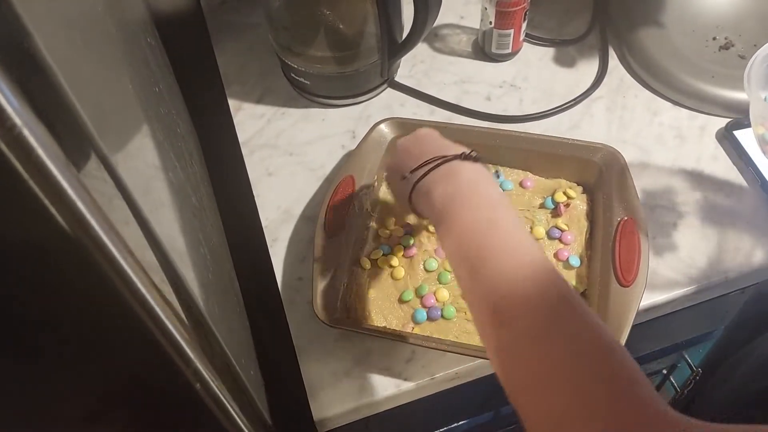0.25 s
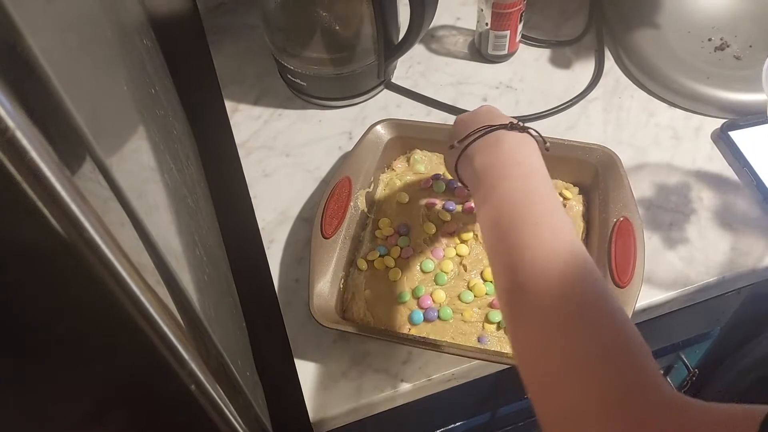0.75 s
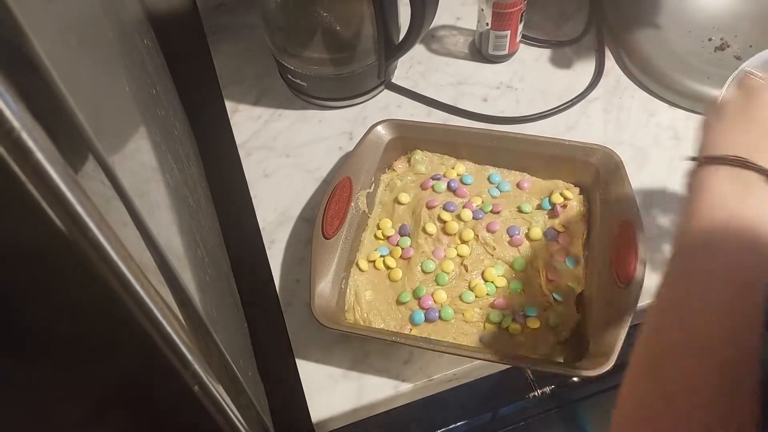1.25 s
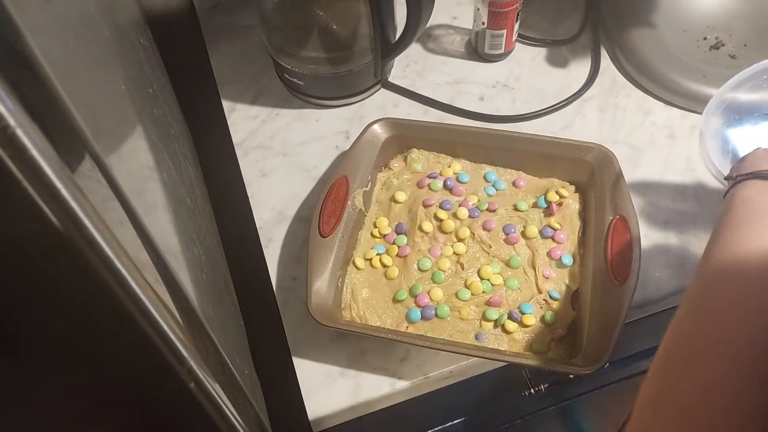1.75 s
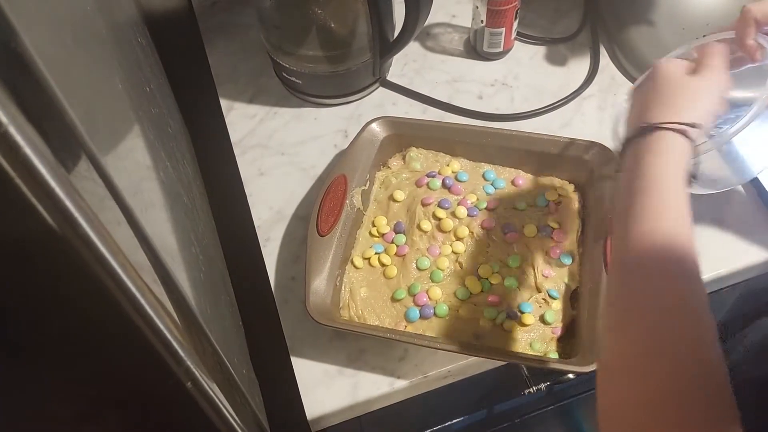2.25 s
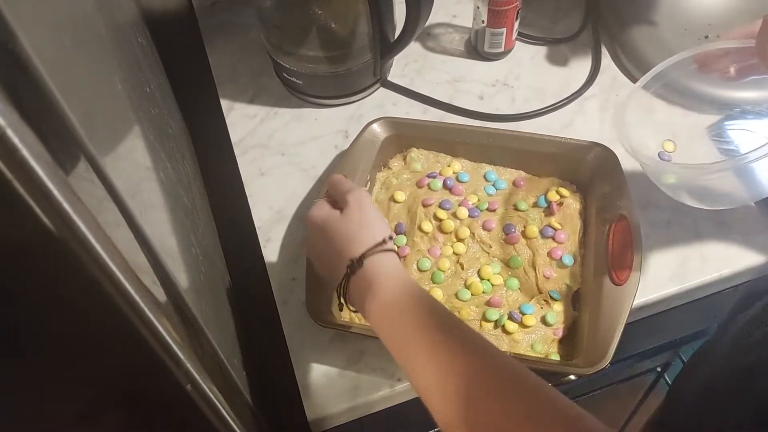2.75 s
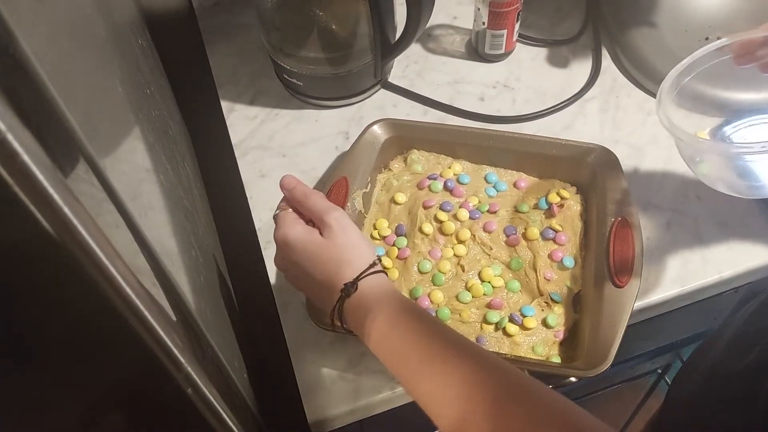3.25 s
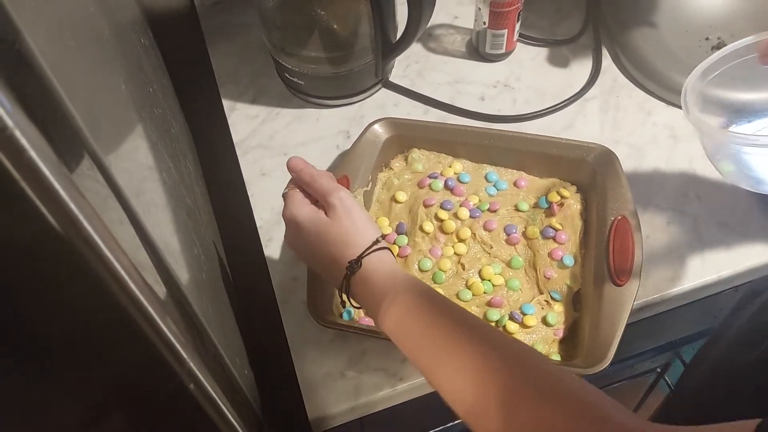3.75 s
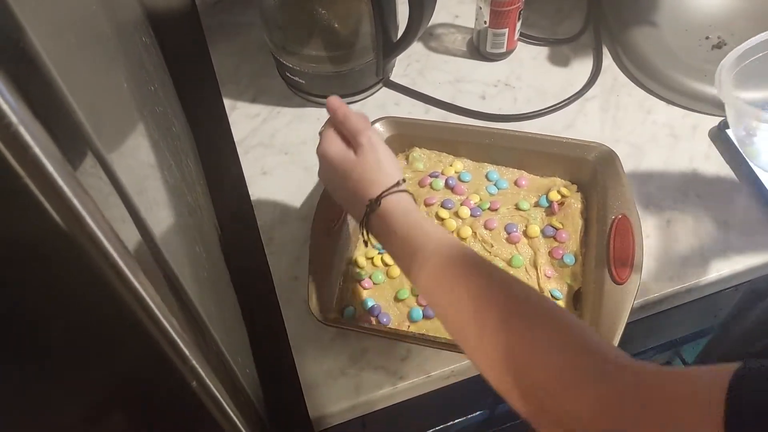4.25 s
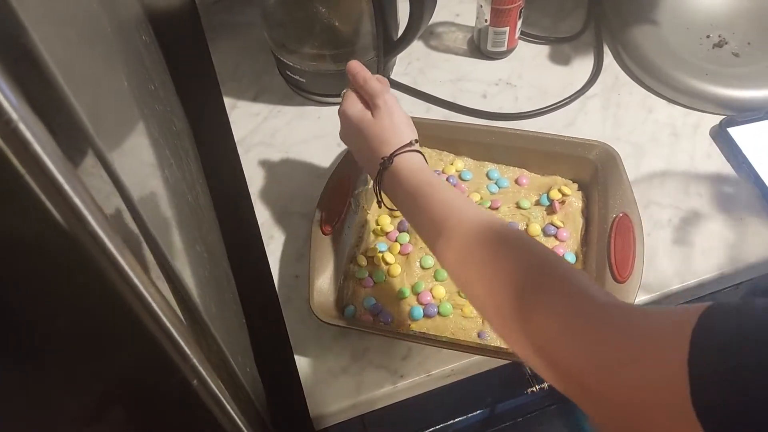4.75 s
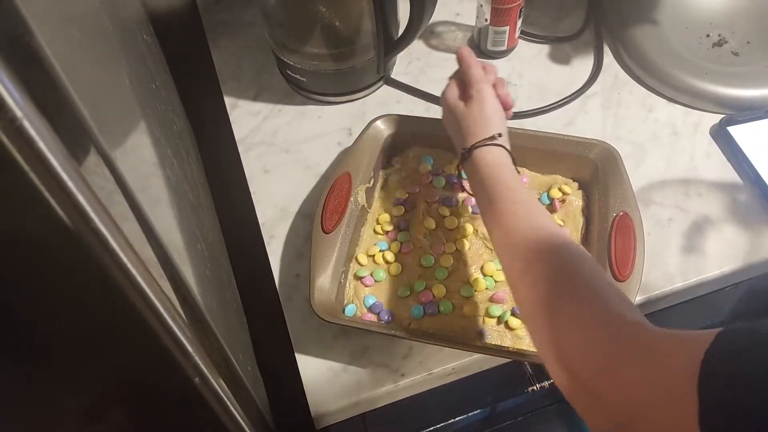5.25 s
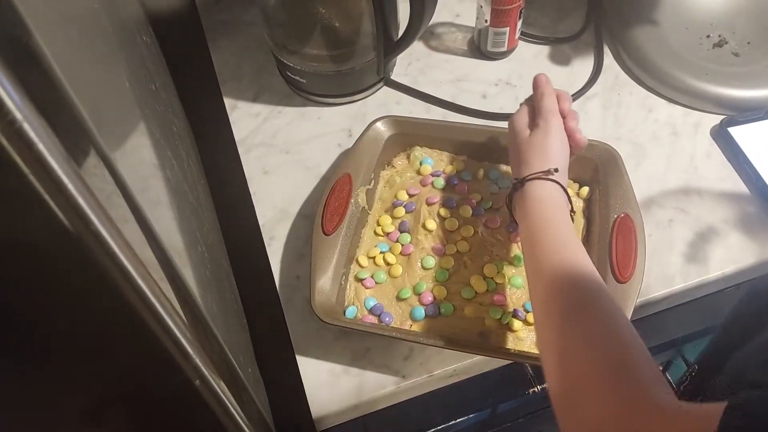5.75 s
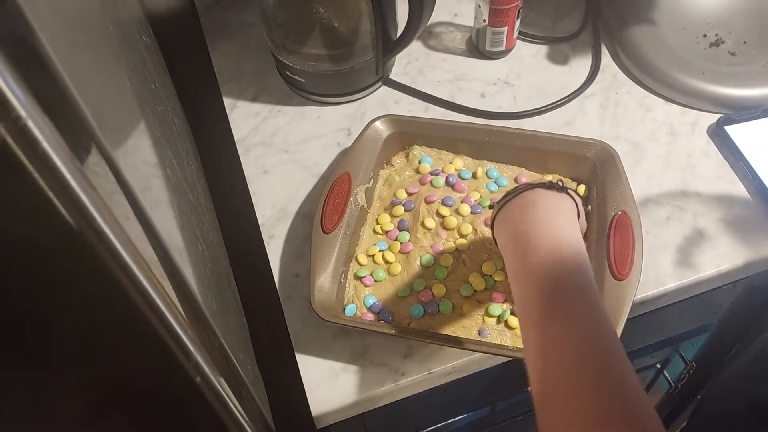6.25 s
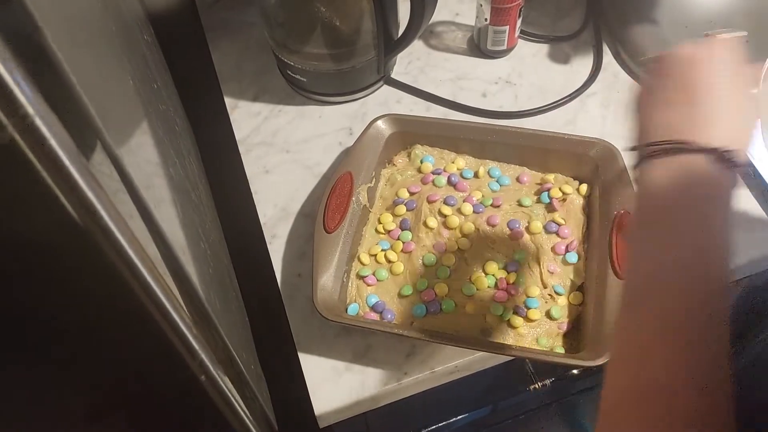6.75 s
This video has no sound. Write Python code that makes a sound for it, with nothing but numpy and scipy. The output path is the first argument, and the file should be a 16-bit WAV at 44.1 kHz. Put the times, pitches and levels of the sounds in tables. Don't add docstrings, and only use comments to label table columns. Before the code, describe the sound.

Bright, dry candy clicks with tiny bounces land on soft batter, in sparse bursts. About a second and a half in, fingers rake a plastic bowl, its thin wall knocking dully while shells clatter. Then a second handful drops in irregular ticks with pauses, a couple of ringing metal-pan strikes and a final patter. Short bright room reflections, faint hiss and a wavering fridge hum; body-worn microphone, near the hands.

```python
import sys
import numpy as np
from scipy import signal
from scipy.fft import rfft, irfft
from scipy.io import wavfile
from scipy.ndimage import uniform_filter1d

SR = 44100
rng = np.random.default_rng(int(sys.argv[2]) if len(sys.argv) > 2 else 0)


def attenuation_scalar(level_db):
    decades = np.asarray(level_db, float) / 20
    return 10 ** decades


def waveform_to_disk(signal):
    frames = np.transpose(np.atleast_2d(signal))
    scaled = np.clip(frames, -1, 1) * 32767
    samples = np.round(scaled).astype(np.int16)
    wavfile.write(sys.argv[1], SR, samples)


N = 308259
BOWL_LAG = 18


def rings(modes, gains, size, wander=0.026):
    hz, db, t60 = (column[:, None] for column in np.transpose(modes))
    t = np.arange(size) / SR
    shift = 1 + wander * rng.standard_normal((len(gains), len(modes), 1))
    tone = np.sin(2 * np.pi * hz * shift * t) * attenuation_scalar(db - 60 * t / t60)
    return np.einsum("ek,ekt->et", gains, tone)


def place(times, grains):
    start = np.round(times * SR).astype(int)[:, None]
    at = (start + np.arange(grains.shape[1])).ravel()
    return np.bincount(at, grains.ravel(), N + grains.shape[1])[:N]


def band(x, lo_hz, hi_hz, order=2):
    limits = [lo_hz, min(hi_hz, 0.45 * SR)]
    return signal.sosfilt(signal.butter(order, limits, "band", fs=SR, output="sos"), x)


def peak_one(grains):
    return grains / np.abs(grains).max(axis=-1, keepdims=True)


def colour(x, hz, db, size=1024):
    f = np.maximum(np.arange(size // 2 + 1) * SR / size, 1)
    log_gain = np.interp(np.log(f), np.log(hz), db) * np.log(10) / 20
    ceps = irfft(log_gain)
    ceps[1:size // 2] *= 2
    ceps[size // 2 + 1:] = 0
    response = irfft(np.exp(rfft(ceps)))
    return signal.fftconvolve(x, response)[:len(x)]


def curve(table):
    s, *columns = np.transpose(table)
    return [np.interp(np.arange(N) / SR, s, column) for column in columns]


def kitchen():
    # (pitch [Hz], left level per Hz [dB], right level per Hz [dB])
    air_levels = [(30.12, -15.5, -14.5), (114.8, -2.5, -10.5), (323.4, -8.5, -13), (736, -46, -32.5),
                  (2000, -43, -31.5), (5800, -32, -39), (7360, -18, -34), (9000, -32, -57.5),
                  (10700, -21.5, -35.5), (12300, -32.5, -38.5), (14900, -24, -25), (15540, -25.5, -37.5),
                  (16100, -60.5, -56)]
    # (time [s], level [dB])
    hum_levels = [(0.25, -83), (0.7, -67.5), (1.25, -76), (2.3, -68), (2.7, -64), (3.05, -76.5), (3.3, -75),
                  (3.5, -93), (3.87, -71.5), (4.03, -88.5), (4.3, -70), (4.82, -68), (5.3, -80.5),
                  (5.76, -65), (5.92, -73), (6.17, -75.5), (6.55, -61.5), (6.8, -71.5)]
    # (pitch [Hz], width [Hz], level [dB])
    motor_lines = [(95, 8.1, -81), (138.03, 2.8, -76), (226, 12, -85.5), (278.2, 3.6, -77),
                   (322, 15, -96.5)]
    hz, left_db, right_db = np.transpose(air_levels)
    shared, own = rng.standard_normal(N), rng.standard_normal((2, N))
    low_pass = signal.butter(1, 350, fs=SR, output="sos")
    lows = 0.54 * signal.sosfilt(low_pass, shared - own)
    left = colour(own[0] + lows[0], hz, left_db, size=4096)
    right = colour(own[1] + lows[1], hz, right_db, size=4096)
    air = np.array([left, right]) * attenuation_scalar(-46)

    wobble_hz = 1.5 * uniform_filter1d(rng.standard_normal(N), SR // 8) * np.sqrt(SR / 8)
    hum = attenuation_scalar(curve(hum_levels)[0] + 5.5) * np.sin(2 * np.pi * np.cumsum(59.5 + wobble_hz) / SR)
    for f, width, db in motor_lines:
        line = band(shared + 0.5 * own, f - width / 2, f + width / 2, order=1)
        hum = hum + line * attenuation_scalar(db) / line.std()
    return air + hum * attenuation_scalar([[3.5], [-7]])


def cracks(count, near_db, far_db, size=1300):
    t = np.arange(size) / SR
    noise, sparse = rng.standard_normal((count, 2, size)).transpose(1, 0, 2)
    fading = attenuation_scalar(near_db - 60 * t / 0.049) + attenuation_scalar(far_db - 60 * t / 0.05)
    scatter = noise * attenuation_scalar(1.3 * sparse) * fading
    scatter[:, 2] += 1
    delay, strength = rng.random((count, 2)).T
    echo_at = (SR * (0.0006 + 0.0007 * delay)).astype(int)
    scatter[np.arange(count), echo_at] += 2.03 * strength
    return scatter * np.minimum((size - np.arange(size)) / 200, 1)


def contacts(s, shell_db, tap_db, tap_hz, thud_db=-14.5, sharpness=0.72, lag=0, hollow_db=-30):
    # (pitch [Hz], level [dB], time to fade by 60 dB [s])
    body_modes = [(1190, -9.5, 0.036), (1654, -1, 0.017), (2074, -4.5, 0.015), (2500, 6.5, 0.0077),
                  (3000, 1, 0.027), (3310, -7.5, 0.02), (4160, -6.5, 0.035)]
    turn = 2 * np.pi * tap_hz[:, None] * np.arange(300) / SR
    broad = np.sin(turn) * np.exp(-turn / 2 / sharpness)
    broad[:, 1] += 0.4
    broad += attenuation_scalar(hollow_db) * np.sin(turn) * np.exp(-turn / 2 / 4.5)
    struck = attenuation_scalar(-27.5 + 4.2 * np.minimum(tap_db - shell_db, 0))[:, None]
    gains = rng.choice([-1.0, -1.2, 0.94, 0.8], (len(s), len(body_modes)))
    body = rings(body_modes, gains, size=1300) * struck
    body[:, :300] += broad

    ports = []
    for port_db in (0.5, -0.5):
        shell = peak_one(band(cracks(len(s), near_db=-24, far_db=-32), 7600, 22000))
        tap = signal.fftconvolve(body, cracks(len(s), near_db=-22, far_db=-22.5), axes=1)[:, :1300]
        tap = peak_one(band(band(tap, 1300, 10000), 950, 14000))
        clicks = place(s, shell * attenuation_scalar(shell_db - 14.5 + port_db)[:, None])
        taps = place(s, tap * attenuation_scalar(tap_db - 7.5)[:, None])
        ports.append(clicks + taps)

    bare = band(place(s, attenuation_scalar(shell_db - 6.5)[:, None]), 5100, 27000)
    bare = bare + band(place(s, body * attenuation_scalar(tap_db + 5)[:, None]), 1100, 7600, order=3)
    thud = band(place(s, attenuation_scalar(0.5 * (shell_db + tap_db) + thud_db)[:, None]), 230, 900)
    return np.array([np.roll(ports[0], lag), ports[1], bare + thud])


def landings(s, shell_db, tap_db, thud_db):
    # (time [s], tap centre [Hz])
    tray_spot = [(0, 4180), (1.2, 4470), (3.08, 4140), (3.095, 3200), (3.13, 3000), (3.23, 1700),
                 (3.26, 1760), (3.3, 4200), (4.0, 4500), (4.68, 2000), (4.87, 2000), (5.0, 5900),
                 (5.75, 5200), (5.78, 2880), (5.83, 2800), (5.98, 4350), (6.39, 4240), (6.41, 1790),
                 (6.5, 4000), (6.7, 4500)]
    tap_hz = np.interp(s, *np.transpose(tray_spot))
    hollow_db = np.where(tap_hz < 2000, -12.5, -30)[:, None]
    first = contacts(s, shell_db, tap_db, tap_hz, thud_db, hollow_db=hollow_db)

    wait, scatter = rng.random((len(s), 2)).T
    again_s = s + 0.003 + 0.0043 * wait
    loss_db = 0.5 * (2 * scatter - 1)
    return first + contacts(again_s, shell_db - 22 + loss_db, tap_db - 13 + loss_db, tap_hz)


def first_handful():
    # (time [s], shell click [dB], body tap [dB])
    drops = [(0.0, -17, -32), (0.0057, -12.5, -60), (0.1342, -34, -62), (0.195, -41, -73),
             (0.2469, -28, -70), (0.3128, -9.5, -34), (0.325, -8.5, -29), (0.3626, -33.5, -41),
             (0.6487, -11, -76), (0.933, -11, -31), (0.952, -29, -45), (0.9641, -8.5, -25.5),
             (1.116, -30.5, -37.5), (1.1341, -39, -40)]
    return landings(*np.transpose(drops), thud_db=1.5)


def room(blows):
    # (pitch [Hz], time to fade by 60 dB [s], level [dB])
    echo_fade = [(483, 0.41, -14), (1260, .28, -11.5), (3500, 0.36, -18), (8900, 0.27, -6),
                 (13300, 0.43, -100)]
    t = np.arange(SR // 2) / SR
    hz, t60, db = np.transpose(echo_fade)
    echoes = 0
    for f in 350 * 2.0 ** np.arange(6):
        life_s, gain_db = (np.interp(np.log(f), np.log(hz), column) for column in (t60, db))
        noise = rng.standard_normal((2, len(t)))
        alike = np.clip(1 - (f / 860) ** 2, 0, 1)
        noise[1] = alike * noise[0] + np.sqrt(1 - alike ** 2) * noise[1]
        echoes = echoes + band(noise, f / 2.17, f * 1.655) * attenuation_scalar(gain_db - 21 - 60 * t / life_s)
    echoes = echoes * np.minimum(t / 0.0067, 1)
    return signal.fftconvolve(blows[None], echoes, axes=1)[:, :N]


def settling():
    # (time [s], shell click [dB], body tap [dB])
    skips = [(0.137, -43, -78.5), (0.3604, -29, -68), (0.3656, -25, -60), (0.3674, -29, -62),
             (0.3706, -33, -68), (0.3828, -33, -65), (0.6797, -36, -58), (0.6923, -44, -61),
             (0.7069, -46, -76), (1.1332, -42, -61), (1.3142, -54, -78), (1.3311, -56, -89),
             (1.3344, -47, -87), (1.3385, -49, -82), (1.4333, -33, -37), (2.8288, -57, -77.5),
             (2.8975, -54, -85), (3.0733, -22, -60), (3.1218, -24, -32), (3.1979, -36, -57),
             (3.2571, -31, -47), (3.6835, -29, -78), (3.6883, -30, -76.5), (3.71, -47, -83),
             (3.7205, -41, -81.5), (3.7292, -46, -83), (3.7358, -53, -83), (3.7388, -50, -78),
             (3.7443, -49, -80.5), (3.7485, -51, -82), (3.7602, -52, -84), (3.8129, -51, -84),
             (3.8501, -50, -79), (3.9773, -23, -62.5), (3.9922, -31, -63), (4.0066, -34.5, -69.5),
             (4.5302, -51.5, -85), (4.539, -50, -82), (4.7478, -10, -43.5), (4.7846, -33, -57),
             (5.0023, -46, -75), (5.4937, -55.5, -88), (5.6932, -11.5, -46.5), (5.7191, -7.5, -46),
             (5.7249, -10, -51), (5.7308, -23, -53), (6.0843, -26, -63), (6.1546, -47, -80.5),
             (6.1795, -33, -76), (6.1883, -42, -72), (6.2006, -33.5, -67), (6.4779, -33, -38),
             (6.5259, -34, -60), (6.6182, -18, -52), (6.647, -17, -49), (6.8827, -57, -73)]
    return contacts(*np.transpose(skips), tap_hz=np.full(len(skips), 4000.0), thud_db=-15.5)


def bowl(s, wall_db, deep_db, upper_db):
    # (pitch [Hz], level [dB], time to fade by 60 dB [s])
    bowl_modes = [
        (289.7, -1.5, 0.08),
        (761.6, 1.5, 0.064),
        (822, 2.5, 0.045),
        (982, 3.5, 0.024),
        (1043.4, -2.5, 0.09),
        (438, -11.5, 0.023),
        (570, -10.5, 0.031),
        (1890, -18, 0.086),
        (667.2, -7.5, .04),
    ]
    size = 3600
    left = size - np.arange(size)
    gains = (-1.0) ** np.arange(len(bowl_modes)) * attenuation_scalar(2 * rng.standard_normal((len(s), len(bowl_modes))))
    gains[:, 0] = attenuation_scalar(deep_db + 1)
    gains[:, 1:3] *= attenuation_scalar(-np.maximum(upper_db, 0))[:, None]
    gains[:, 3:5] *= attenuation_scalar(np.minimum(upper_db, 0))[:, None]
    grip = attenuation_scalar(-10.5 * np.clip((np.arange(size) / SR - 0.012) / 0.003, 0, 1))
    ring = rings(bowl_modes[1:], gains[:, 1:], size, wander=0.017) * grip
    ring = ring + rings(bowl_modes[:1], gains[:, :1], size, wander=0.01)
    ring = band(band(ring, 230, 2300), 130, 6000) * np.minimum(left / 600, 1)
    wall = place(s, ring * attenuation_scalar(wall_db - 10.5)[:, None])
    wall = wall + band(place(s, attenuation_scalar(wall_db + 4.5)[:, None]), 76, 350, order=3)
    return np.array([wall, 1.5 * np.roll(wall, -4), wall])


def knocks():
    # (time [s], wall [dB], deep mode relative to wall [dB], upper minus lower modes [dB])
    blows = [(1.115, -61.5, 9, 5), (1.14, -53.5, -18, 16), (1.4421, -36, -4, 5), (1.4544, -22, -9, 7.5),
             (1.468, -18, -32, 10), (1.5866, -21, -7, -14), (1.667, -19.5, -42, 3),
             (1.6748, -15.5, -3.5, 13), (1.7752, -25.5, -19.5, 12), (1.8342, -34.5, -31, -5),
             (1.904, -31, -21, 8), (1.9376, -28, -29, 8.5), (1.979, -27, -30.5, 11.5), (2.037, -34, 0, 8),
             (2.0877, -16, -7.5, 3.5), (2.1243, -20.5, -20.5, 3.5), (2.143, -22, -4, 6.5),
             (2.1692, -25.5, -4.5, 3), (2.3481, -3, -10.5, -12), (2.372, -26, -12, -14.5),
             (2.397, -17, -9, -17), (2.4672, -13.5, -7, 1), (2.5226, -36, 4, -4), (2.5977, -28.5, -45, 35),
             (2.6665, -38, -35, 4), (3.864, -60, -31.5, -7), (0.934, -52.5, -29, -7),
             (0.313, -56.5, -33.5, -7.5), (2.231, -27, -25, 4.5), (6.77, -59.5, -18.5, 7),
             (6.866, -54.5, -19, 5), (6.885, -52, -23.5, 17), (6.8, -62, -22, 4), (6.935, -64, -16, 11.5)]
    return bowl(*np.transpose(blows))


def further_contacts():
    # (time [s], shell click [dB], body tap [dB], tap centre [Hz])
    single_contacts = [(0.6556, -21.5, -44, 1510), (1.141, -46, -56, 4500), (2.677, -25, -61, 2500),
                       (3.8632, -37, -44.5, 1400), (4.7568, -25, -25.5, 5500), (4.852, -25, -25.5, 5600),
                       (4.6926, -26, -37.5, 2000), (5.048, -32, -33, 1915), (6.87, -64, -51.5, 2372),
                       (0.9517, -45, -32.5, 2500), (1.161, -53, -49, 3500), (1.211, -62, -55, 2500),
                       (3.246, -29, -27.5, 3500), (3.876, -59, -60, 1600), (3.892, -66, -49.5, 1510),
                       (3.909, -65, -58, 1495), (3.9519, -27, -38.5, 3000), (5.008, -33, -47, 4000),
                       (6.4137, -9, -12.5, 4200), (6.4177, -11, -20.5, 1490), (6.417, -23, -14, 6500),
                       (1.667, -43, -28, 2500), (3.104, -17.5, -16.5, 4280), (3.1238, -20, -23, 1500),
                       (5.726, -26.5, -34.5, 3500), (6.437, -34, -20, 6000), (6.465, -33.5, -27, 5800),
                       (6.563, -22, -25, 4500), (6.59, -25, -32.5, 5000), (6.624, -25, -33, 5950)]
    return contacts(*np.transpose(single_contacts))


def counter():
    # (time [s], level [dB])
    bumps = [
        (1.229, -59.5),
        (3.348, -60.5),
        (5.059, -55.5),
        (6.451, -57.5),
        (6.62, -57),
    ]
    # (pitch [Hz], level [dB], time to fade by 60 dB [s])
    counter_modes = [(145.7, 0, 0.13), (230, 0.5, 0.14), (331, -2.5, 0.16)]
    s, bump_db = np.transpose(bumps)
    gains = rng.uniform(0.84, 1, (len(s), len(counter_modes)))
    swell = np.minimum(np.arange(4000) / SR / 0.012, 1)
    ring = rings(counter_modes, gains, size=4000, wander=0.068) * swell
    bump = place(s, ring * attenuation_scalar(bump_db)[:, None])
    return np.array([bump, 0.6 * bump, bump])


def rattling():
    # (time [s], shell click [dB], body tap [dB])
    rattle = [(1.4403, -34, -34), (1.4496, -19, -38), (1.4913, -30, -34), (1.5151, -35, -37),
              (1.5444, -35.5, -40), (1.5588, -39, -39), (1.58, -43, -46), (1.5894, -43, -33),
              (1.6067, -36, -32), (1.6201, -38, -45), (1.629, -40, -45), (1.6383, -48, -39),
              (1.646, -35.5, -41), (1.6728, -39, -28), (1.685, -24.5, -33.5), (1.708, -20, -19),
              (1.7247, -23.5, -25), (1.7367, -29, -35), (1.7416, -21, -33), (1.777, -16.5, -34),
              (1.787, -23, -35.5), (1.789, -25.5, -37.5), (1.8151, -30, -38.5), (1.8528, -23, -42),
              (1.8657, -25.5, -33), (1.87, -22.5, -42.5), (1.9237, -19.5, -39.5), (1.94, -32, -31),
              (1.9586, -34.5, -39.5), (1.973, -32, -40.5), (1.977, -32, -40), (1.9896, -19, -36),
              (2.0049, -26, -37.5), (2.022, -31.5, -41.5), (2.0724, -38, -48.5), (2.0882, -29, -29),
              (2.1255, -27, -22.5), (2.1394, -32, -28.5), (2.2092, -33, -37), (2.2523, -27, -34),
              (2.274, -29, -34), (2.329, -32, -35), (2.37, -28, -32.5), (2.3883, -17, -27.5),
              (2.4116, -20.5, -33), (2.482, -33, -32.5), (2.4901, -22, -26), (2.512, -23.5, -34.5),
              (2.5216, -31, -40), (2.5376, -33.5, -40), (2.557, -30, -36), (2.5732, -41.5, -46),
              (2.6037, -20.5, -26.5), (2.6251, -36.5, -57), (2.6325, -51, -42), (2.6421, -40, -45),
              (2.6772, -21.5, -48), (2.7176, -45.5, -57), (2.7699, -46, -60), (2.7845, -43.5, -57)]
    return contacts(*np.transpose(rattle), tap_hz=np.full(len(rattle), 2500.0), lag=BOWL_LAG)


def stirring(rate=100, spread_db=3.0):
    # (time [s], effort [dB], share of shell on shell [dB])
    stir = [
        (1.442, -35, -7.5),
        (1.5, -40, -26.5),
        (1.65, -45.5, -21),
        (1.74, -36.5, -13.5),
        (1.9, -32.5, -6),
        (2.06, -43, -11.5),
        (2.3, -51.5, -8),
        (2.42, -39.5, -14.5),
        (2.8, -89.5, -8),
    ]
    s = np.sort(rng.uniform(stir[0][0], stir[-1][0], int(rate * 1.5)))
    tap_db, share_db = (column[(s * SR).astype(int)] for column in curve(stir))
    shell_db = tap_db + share_db
    wall_db = -50 + 0.92 * (tap_db + 43)
    extra_db = spread_db * rng.exponential(size=(len(s), 3)).T
    tap_hz = 2600 * attenuation_scalar(18 * rng.standard_normal(len(s)))
    small = contacts(s, shell_db + 17 + extra_db[0], tap_db + 6.5 + extra_db[1], tap_hz, lag=BOWL_LAG)
    nudge_s, nudge_db = s[::2], (wall_db + 4.5 + extra_db[2])[::2]
    return small + bowl(nudge_s, nudge_db, np.full(len(nudge_s), -14.0), np.full(len(nudge_s), 2.0))


def scooping():
    # (time [s], shell click [dB], body tap [dB], tap centre [Hz])
    scoop = [(1.4449, -36, -17, 3150), (1.4498, -24.5, -19.5, 2400), (1.4701, -18.5, -17, 1650),
             (1.59, -45, -22.5, 1500), (1.6767, -41, -19.5, 1300), (1.6985, -13.5, -20.5, 2460),
             (1.7654, -16, -20, 2390), (1.8217, -20, -16, 4900), (1.849, -19, -35.5, 3100),
             (1.9055, -13, -17, 3736), (1.9631, -42.5, -19, 2260), (1.9923, -20.5, -28.5, 2470),
             (2.0343, -14.5, -36.5, 4290), (2.0895, -30.5, -19.5, 3278), (2.1256, -31.5, -12, 2349),
             (2.1691, -30, -16, 2502), (2.1728, -20, -11.5, 3200), (2.2303, -36.5, -18.5, 2700),
             (2.2429, -24.5, -9.5, 2421), (2.3255, -36.5, -25, 2700), (2.3487, -23.5, -10, 3000),
             (2.392, -17, -13.5, 2287), (2.396, -5, -10, 3330), (2.4477, -23.5, -13.5, 2700),
             (2.468, -14, -8, 2083), (2.5176, -17.5, -23.5, 2460), (2.5605, -16.5, -26, 2700),
             (2.5972, -11, -18, 3220), (2.6673, -28.5, -26, 2920), (2.749, -17.5, -46.5, 6200)]
    return contacts(*np.transpose(scoop), lag=BOWL_LAG, hollow_db=-9)


def second_handful():
    # (time [s], shell click [dB], body tap [dB])
    later_drops = [(2.9684, -34, -62.5), (3.0694, -14.5, -37), (3.0752, -27, -31.5), (3.1, -8, -16.5),
                   (3.1192, -5.5, -22), (3.241, -9, -24.5), (3.2537, -29.5, -43), (3.3072, -10, -23.5),
                   (3.3133, -10, -35), (3.6499, -30, -67), (3.6856, -26, -64), (3.692, -30, -72),
                   (3.8619, -35.5, -46), (3.9473, -9.5, -29.5), (4.5897, -40.5, -69.5), (4.687, -18.5, -36.5),
                   (4.7066, -11.5, -41), (4.7502, -6.5, -25), (4.8212, -27.5, -68), (4.8518, -8.5, -28.5),
                   (4.8605, -13.5, -31), (5.0144, -20, -48), (5.0488, -3.5, -36), (5.1385, -13, -28.5),
                   (5.6817, -6.5, -28), (5.6915, -23, -30), (5.719, -30, -27.5), (5.7391, -30, -57),
                   (5.785, -13.5, -14), (5.8199, -14, -14), (5.9874, -8, -23), (6.0698, -27.5, -45.5),
                   (6.0872, -34, -58), (6.106, -36, -53), (6.136, -36, -74), (6.167, -26.5, -68),
                   (6.1983, -37.5, -51), (6.2039, -23.5, -72), (6.278, -33.5, -63), (6.3837, -20, -41),
                   (6.413, -10, -20), (6.53, -34, -41), (6.5571, -13, -29.5), (6.574, -19, -26),
                   (6.58, -7, -22), (6.6014, -13, -22.5), (6.6088, -5.5, -23), (6.6158, -23, -41),
                   (6.6385, -18.5, -30.5), (6.6416, -16.5, -38), (6.6493, -24, -35), (6.665, -36, -53)]
    return landings(*np.transpose(later_drops), thud_db=-4.5)


def rim():
    # (time [s], level [dB])
    rim_hits = [
        (3.103, -50.5),
        (3.119, -49),
        (5.786, -31),
        (5.8189, -34.5),
        (6.411, -53),
    ]
    # (pitch [Hz], level [dB], time to fade by 60 dB [s])
    rim_modes = [(1166, -11, 0.074), (1605, -6.5, 0.039), (1745, 0.5, 0.051), (2085, -1, 0.04),
                 (2491, 1, 0.052), (2860, 0.5, 0.035), (3310, 3, 0.045), (3890, -13, .04),
                 (5260, 8.5, 0.0074)]
    s, hit_db = np.transpose(rim_hits)
    gains = rng.uniform(0.9, 1, (len(s), len(rim_modes))) * (-1.0) ** np.arange(len(rim_modes))
    ring = rings(rim_modes, gains, size=3000, wander=0.002)
    ring = band(place(s, ring * attenuation_scalar(hit_db)[:, None]), 790, 9000)
    return np.array([ring, 1.5 * np.roll(ring, -5), 0.64 * ring])


def microphone_ports(sound):
    # (pitch [Hz], left level [dB], right level [dB])
    port_gains = [(60, 1, -3), (235, 7.5, -1), (851, -0.5, 0.5), (2700, -2.5, 3), (4500, 4, 3.5),
                  (6200, 7, -1), (7703, 9.5, 6.5), (8970, 2, -3), (10870, 6.5, 12.5), (11940, 8, 24),
                  (13450, 3, 21), (15200, 15, 7), (15930, 10.5, -19.5), (17800, -108, -30)]
    hz, left_db, right_db = np.transpose(port_gains)
    return np.array([colour(sound[0], hz, left_db), colour(sound[1], hz, right_db)])


def scene():
    tray = first_handful() + settling() + second_handful() + rim()
    in_bowl = knocks() + rattling() + stirring() + scooping()
    blows = tray + in_bowl + further_contacts() + counter()
    heard = blows[:2] + room(blows[2])
    return microphone_ports(heard) + kitchen()


def roll_off(x):
    return signal.sosfilt(signal.butter(12, 17010, fs=SR, output="sos"), x)


def record(dry):
    return roll_off(dry)


dry = scene()
out = record(dry)
waveform_to_disk(out)
```